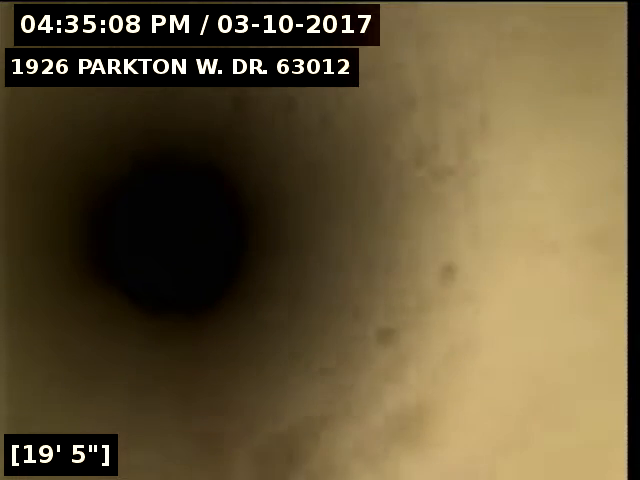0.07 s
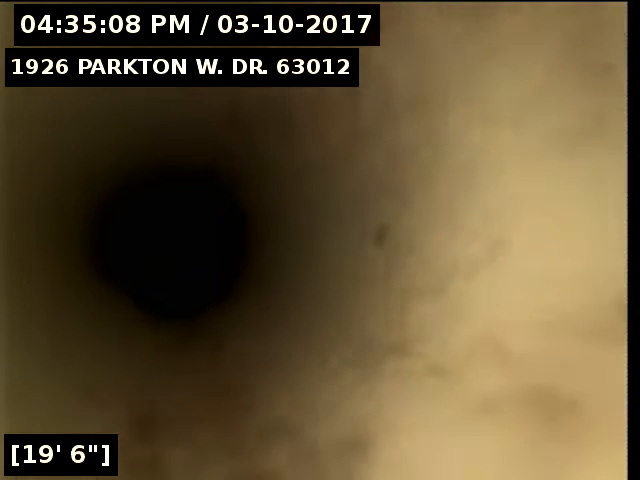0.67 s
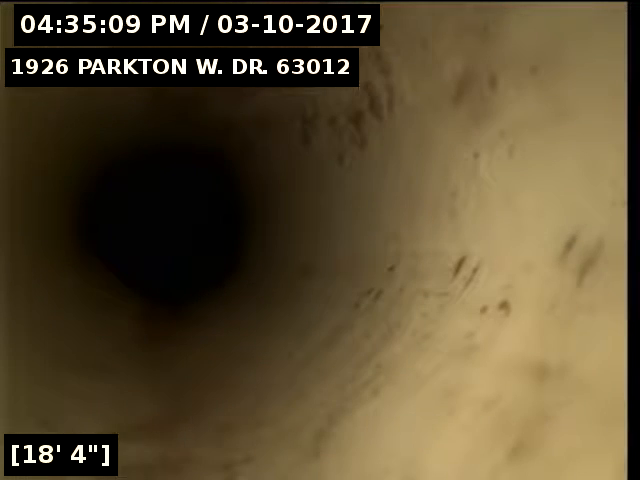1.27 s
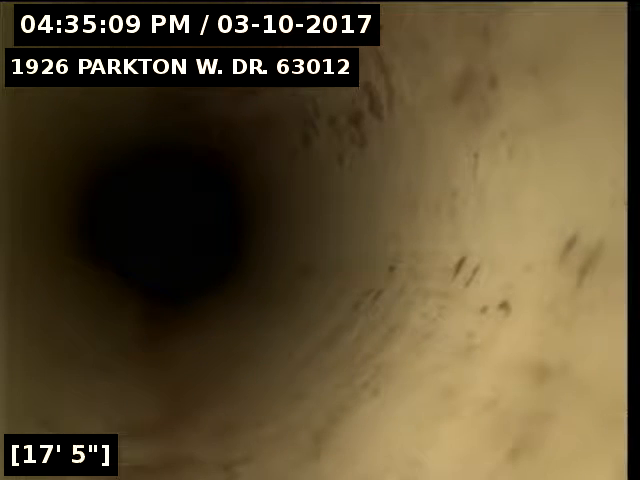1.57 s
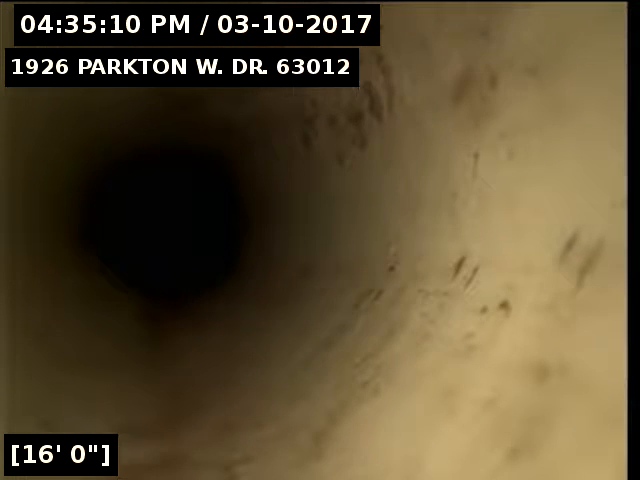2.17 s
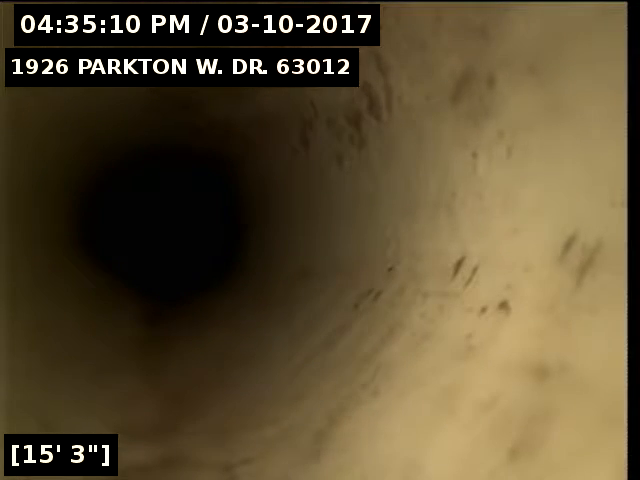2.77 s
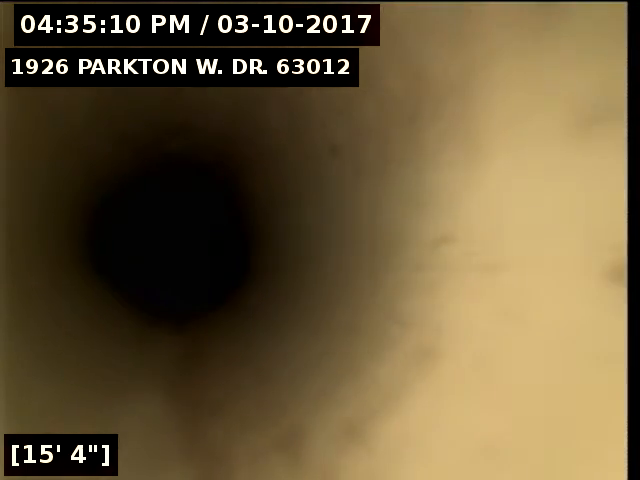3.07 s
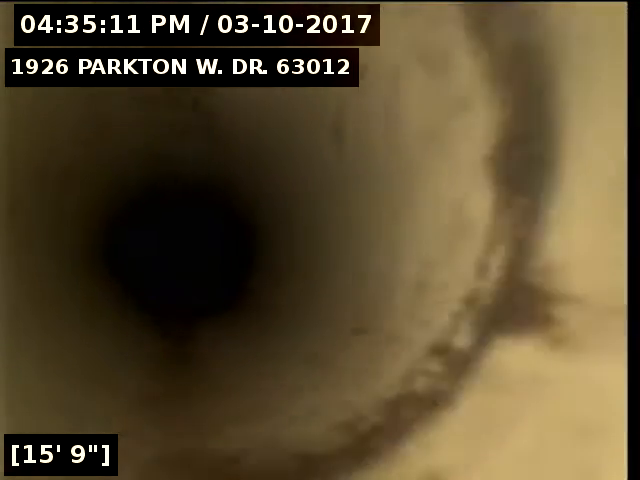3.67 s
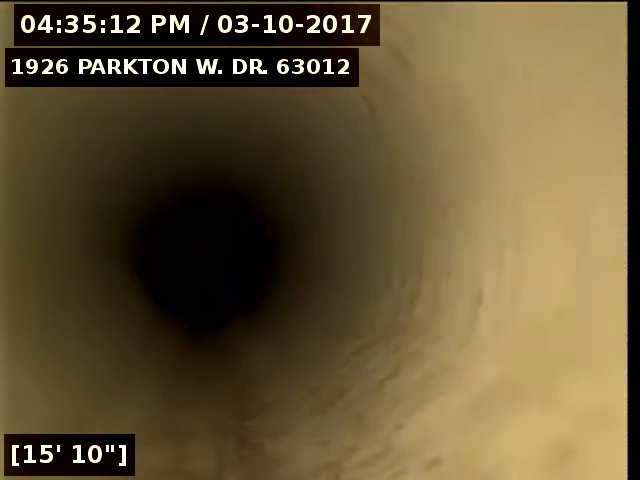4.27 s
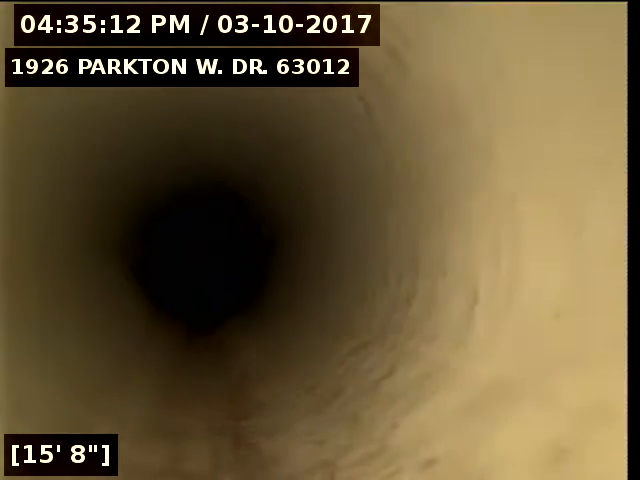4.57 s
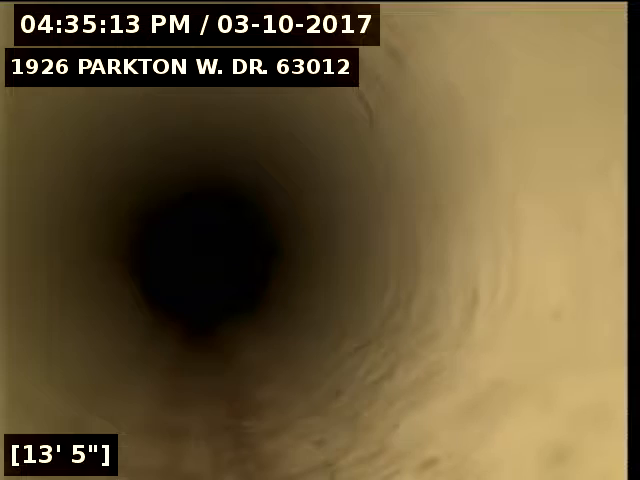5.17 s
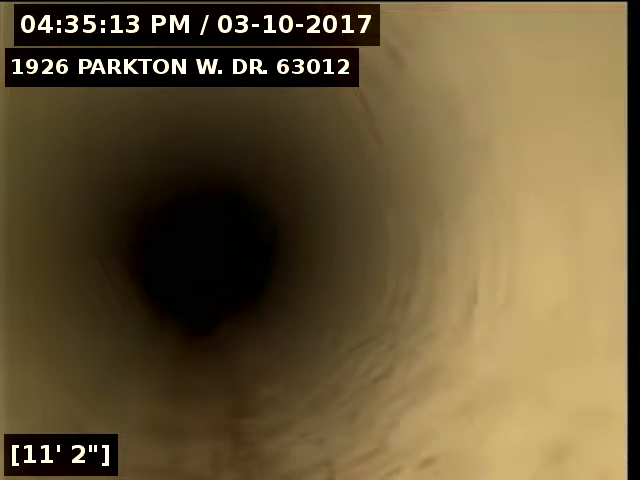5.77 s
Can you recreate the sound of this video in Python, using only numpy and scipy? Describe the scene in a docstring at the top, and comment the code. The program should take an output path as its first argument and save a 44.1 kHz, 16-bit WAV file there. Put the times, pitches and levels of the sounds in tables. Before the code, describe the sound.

Uneven rasping of a cable winding onto a metal reel in a basement, broken by sharp knocks and one loud bang.

```python
"""A push cable, hauled out of a drain, rubs back onto its reel in uneven pulls.
It drags in the reel cage, rasps and hisses through a steel guide and squeaks now and then.
It also slaps the frame, once very hard; the frame rings and the basement around it reverberates.
The microphone is a small built-in one with a notch in the treble, near enough to overload on that slap."""
import sys
import numpy as np
from scipy import signal
from scipy.io import wavfile
from scipy.ndimage import uniform_filter1d

SR = 44100
rng = np.random.default_rng(int(sys.argv[2]) if len(sys.argv) > 2 else 0)


def bounce(signal):
    """Save signal as a 16-bit WAV file at the path given by the first command-line argument."""
    frames = np.transpose(np.atleast_2d(signal))
    limited = np.clip(frames, -1, 1)
    pcm = np.round(limited * 32767).astype(np.int16)
    wavfile.write(sys.argv[1], SR, pcm)


N = 257103
TIME = np.arange(N) / SR

# Levels in the tables are relative; each source sets its own balance.
# the cable runs, nearly stops after the hardest slap, then picks up: (time [s], rasp [dB], hiss [dB])
CABLE_RUN = [(0, -57, -60), (.25, -61, -63), (.9, -60.5, -62.5), (1.25, -58.5, -62), (1.6, -54, -58),
             (1.85, -56.5, -62), (2.72, -66, -70.5), (2.93, -60.5, -63), (3.18, -57.5, -59),
             (3.55, -59, -64), (3.87, -57.5, -59), (4.1, -59.5, -65.5), (4.9, -55.5, -60.5),
             (5.33, -60.5, -64.5), (5.8, -58, -62)]
# long hauls, the reel turning and the coil dragging in its cage: (start [s], length [s], rub [dB])
LONG_HAULS = [(0.406, 0.84, -55.5), (1.33, 0.74, -52), (3.772, 0.76, -49.5), (4.8, 1.0, -54)]
# a loop of cable scrapes along the cage: (start [s], length [s], rub [dB], rasp [dB])
LOOP_SCRAPES = [(0.313, 0.044, -45, -59), (0.523, 0.087, -39.5, -62), (0.813, 0.18, -43.5, -55.5),
                (1.012, 0.084, -40, -76), (1.318, 0.22, -39, -50.5), (2.35, 0.023, -44.5, -59.5),
                (3.842, 0.083, -54, -55), (4.318, 0.069, -49, -71), (4.806, 0.088, -42.5, -56),
                (4.912, 0.14, -46.5, -56.5), (5.372, 0.2, -39, -52.5), (5.634, 0.13, -37.5, -52.5)]
# slaps on the frame: (time [s], thud [dB], crack [dB], chatter length [s], brightness [dB/octave])
FRAME_SLAPS = [(0.562, -28, -28.5, 0.0086, -1), (0.595, -34.5, -64, .008, -5.5),
               (0.792, -38.5, -65, 0.0018, -2), (0.952, -31, -52, 0.0014, -6.5),
               (1.327, -25, -56, .002, -1.5), (1.483, -30, -66, .006, -2.5), (2.031, 0.5, -6.5, .010, 0.5),
               (2.106, -19, -25.5, .0024, -1.5), (3.244, -46, -43, .008, 7),
               (4.125, -19.5, -19, 0.0055, -3.5), (4.803, -42, -64, 0.0019, 0.5),
               (5.739, -33, -44, 0.0017, -1), (5.777, -26.5, -52, 0.0045, -3.5)]
# the cable squeaks in its guide: (time [s], level [dB], pitch [Hz], length [s])
GUIDE_SQUEAKS = [(2.361, -62.5, 4740, 0.011), (2.735, -71, 2100, .06), (3.26, -45.5, 6296, 0.021)]
# modes of the rubbed cage, the steel guide and the struck frame: (frequency [Hz], level [dB])
CAGE_MODES = [(136, -7.5), (191, -3), (237, -6), (315, 1.5), (349, -3), (378, -2.5), (455, -0.5),
              (493, 0.5), (553, 2), (672, -4.5), (829, -4), (941, -5.5), (996, -12)]
GUIDE_MODES = [(1203, 6.5), (1339, 7), (1497, -8), (2017, -2.5), (2274, -1), (2308, -9.5)]
FRAME_MODES = [(237, -8.5), (318, -2), (415, -16.5), (454, -6.5), (493, -1.5), (549, -6), (641, -2),
               (673, -4.5), (719, -5.5), (771, -7), (817, -12), (922, -5.5), (953, -11.5), (984, -4),
               (1028, -4.5), (1244, -12.5), (1291, -12.5), (1371, -8.5), (1421, -14), (1628, -14),
               (1708, -14.5), (1771, -19), (1925, -15.5), (2020, -15.5), (2208, -28.5), (2357, -16.5),
               (2409, -9.5), (2482, -17), (2628, -13), (3059, -19)]
# noise spectra of the sliding cable: (frequency [Hz], density [dB])
RUB_SPECTRUM = [(40, -27), (80, -21.5), (120, -4.5), (230, -10), (275, -19), (330, -7.5), (440, 2),
                (560, 1), (700, -2), (850, -12), (1050, -17), (1500, -23), (3000, -44)]
RASP_SPECTRUM = [(40, -4), (500, -2.5), (1000, 1), (1280, -0.5), (1600, -2.5), (2400, -5), (3100, -5.5),
                 (4000, -23), (6000, -36.5)]
HISS_SPECTRUM = [(1000, -8.5), (2500, -10.5), (3500, -2.5), (5000, 3.5), (6100, 6.5), (7200, -3),
                 (8300, -20), (9500, -23.5)]
# noise spectra of a slap: (frequency [Hz], density [dB])
THUD_SPECTRUM = [(30, -31.5), (70, -29), (110, -4), (200, -7), (320, -5), (650, -0.5), (1000, -1.5),
                 (1300, -9), (2000, -12.5), (4000, -39.5)]
CRACK_SPECTRUM = [(40, -32), (150, -11), (500, -3), (1500, 5), (2400, 6.5), (3200, 1.5), (4700, -1.5),
                  (6300, 4), (7400, -14), (9000, -33)]
# basement reverberation, scaled separately for thud and crack: (frequency [Hz], base t60 [s])
BASEMENT_DECAY = [(60, 1), (200, 0.68), (600, 0.76), (1200, 0.44), (2500, 0.15), (6000, 0.24),
                  (9000, 0.073)]


def cage_rub(level_db, ring_db, noise_db):
    """Slips of the coiled cable drive the cage modes, over a dull rubbing noise."""
    jerks = slips(per_s=550, spread_db=-0.5)
    ringing = cut_lows(modes(jerks, CAGE_MODES, t60=0.71), low_hz=90.5)
    rubbing = friction(RUB_SPECTRUM, flutter_db=2.0, flutter_per_s=55)
    return from_db(level_db) * (from_db(ring_db) * ringing + from_db(noise_db) * rubbing)


def guide_rasp(level_db, ring_db, noise_db):
    """The cable's jacket grates through the guide and keeps it faintly singing."""
    ringing = modes(slips(per_s=640, spread_db=-3.0), GUIDE_MODES, t60=0.18)
    grating = friction(RASP_SPECTRUM, flutter_db=0.37, flutter_per_s=120)
    return from_db(level_db) * (from_db(ring_db) * ringing + from_db(noise_db) * grating)


def sliding_hiss(level_db):
    """The sliding cable gives off a high, slightly fluttering hiss."""
    return from_db(level_db) * friction(HISS_SPECTRUM, flutter_db=0.9, flutter_per_s=24)


def cable_levels():
    """Rub, rasp and hiss in dB: all follow the running cable and swell with each scrape; hauls add rub."""
    running_db, sliding_db = in_time(CABLE_RUN)
    rubs, rasps = [], []
    for start, length, db in LONG_HAULS:
        rubs.append(from_db(db) * stroke(start, length, attack_s=0.015, release_s=0.36))
    for start, length, rub, rasp in LOOP_SCRAPES:
        rubs.append(from_db(rub) * stroke(start, length, attack_s=0.043, release_s=0.054))
        rasps.append(from_db(rasp) * stroke(start, length, attack_s=0.043, release_s=0.099))
    rub_db = power_sum_db([from_db(running_db - 1)] + rubs)
    rasp_db = power_sum_db([from_db(running_db)] + rasps)
    scrape_hiss_db = power_sum_db(rasps) - 9
    hiss_db = power_sum_db([from_db(sliding_db), from_db(scrape_hiss_db)])
    return rub_db, rasp_db, hiss_db


def slaps(ring_db, thud_db, crack_db, snap_db, crack_s):
    """Each slap is a bright crack and a chattering thud that leaves the frame ringing."""
    contacts = slap_contacts(touch_db=-5, landing_lag=0.9)
    thud_power = sum(from_db(2 * db) * blow(start, length) for start, db, length, _ in contacts)
    crack_power = sum(from_db(2 * db) * blow(start, crack_s) for start, _, db, _, _ in FRAME_SLAPS)
    ringing = from_db(ring_db) * frame_ring(contacts, after_ring_db=-20)
    thuds = from_db(thud_db) * basement_reverb(thud_power, THUD_SPECTRUM, decay_scale=0.46)
    cracks = from_db(crack_db) * basement_reverb(crack_power, CRACK_SPECTRUM, decay_scale=0.99)
    # the crack reaches the microphone dry before its reflections build up
    snap_noise = sum(band for _, band in noise_bands(CRACK_SPECTRUM))
    snaps = from_db(snap_db) * np.sqrt(crack_power * crack_s * SR) * snap_noise
    return ringing + thuds + cracks + snaps


def slap_contacts(touch_db, landing_lag):
    """A loop touches lightly, then lands with its weight landing_lag chatter lengths later."""
    touches, landings = [], []
    for start, db, _, length, brightness in FRAME_SLAPS:
        touches.append((start, db + touch_db, length, brightness))
        landings.append((start + landing_lag * length, db, length, brightness))
    return touches + landings


def frame_ring(contacts, after_ring_db):
    """The struck frame rings briefly; a weak after-ring lingers, longest in the middle modes."""
    starts, contact_db, lengths, brightness = np.transpose(contacts)
    ringing = 0
    for hz, db in FRAME_MODES:
        octaves = np.log2(hz / 600)
        # the chatter reaches each mode at a moment of its own; each slap's brightness tilts it towards the high
        # or low modes
        delay, polarity = rng.random((len(starts), 2)).T
        arrivals = ((starts + lengths * delay) * SR).astype(int)
        push = np.zeros(N)
        push[arrivals] = from_db(contact_db + brightness * octaves) * np.sign(polarity - 0.5)
        first_ring = ring(push, hz, t60=0.16 * 2 ** (-0.25 * max(octaves, 0)))
        after_ring = ring(push, hz, t60=0.74 * 2 ** (-0.4 * abs(octaves)))
        ringing += from_db(db) * (first_ring + from_db(after_ring_db) * after_ring)
    return cut_lows(ringing, low_hz=180)


def squeaks(t60, detune):
    """A short stick-slip in the guide excites a cluster of three high, close modes."""
    out = 0
    for start, db, hz, length in GUIDE_SQUEAKS:
        push = np.sqrt(blow(start, length)) * rng.standard_normal(N)
        cluster = sum(ring(push, hz * (1 + detune * k), t60) for k in (-1, 0, 1))
        peak_rms = np.sqrt(uniform_filter1d(cluster ** 2, size=900).max())   # loudest 20 ms
        out += from_db(db) * cluster / peak_rms
    return out


def basement_reverb(power, spectrum, decay_scale):
    """Dense reflections store the power of the blows and lose it band by band."""
    out = 0
    for hz, band in noise_bands(spectrum):
        t60 = decay_scale * at_hz(BASEMENT_DECAY, hz)
        power_kept = from_db(-120 / (t60 * SR))
        stored = signal.lfilter([1], [1, -power_kept], power + 1e-24)
        out += band * np.sqrt(stored)
    return out


def slips(per_s, spread_db):
    """Tiny stick-slip jerks of uneven size, at random moments."""
    sizes = from_db(spread_db * np.minimum(rng.exponential(1, N), 4))
    signs = rng.choice([-1, 1], N)
    return sizes * signs * (rng.random(N) < per_s / SR)


def friction(spectrum, flutter_db, flutter_per_s):
    """Rubbing noise whose bands flutter as the contact grips and lets go; rms 1."""
    grip = drift(flutter_per_s)   # common to all bands
    out = 0
    for _, band in noise_bands(spectrum):
        out += band * from_db(flutter_db * (grip + drift(flutter_per_s)))
    return rms_one(out)


def stroke(start, length, attack_s, release_s):
    """Gain of one contact: it rises, holds, then falls to 1/e in release_s."""
    age = TIME - start
    rise = np.clip(age / attack_s, 0, 1)
    return rise * np.exp(-np.clip((age - length) / release_s, 0, 60))


def blow(start, length):
    """Power fed in by one brief contact: it starts at once and dies away; sum 1."""
    age = TIME - start
    power = (age >= 0) * np.exp(-np.clip(age / length, 0, 60))
    return power / power.sum()


def modes(push, table, t60):
    """A body rings in all the modes of its table, in alternating polarity; rms 1."""
    return rms_one(sum((-1) ** k * from_db(db) * ring(push, hz, t60) for k, (hz, db) in enumerate(table)))


def ring(push, hz, t60):
    """One mode: a unit click sets a sine of height 1 ringing."""
    decay, angle = from_db(-60 / (t60 * SR)), 2 * np.pi * hz / SR
    return signal.lfilter([0, np.sin(angle)], [1, -2 * decay * np.cos(angle), decay ** 2], push + 1e-18)


def cut_lows(x, low_hz):
    """Little of the ringing sounds below low_hz."""
    return signal.sosfilt(signal.butter(2, low_hz, "high", fs=SR, output="sos"), x)


def noise_bands(spectrum):
    """Third-octave noise bands as (centre [Hz], samples); their powers sum to 1."""
    edges = 28 * 2 ** (np.arange(26) / 3) * 1.06
    white, bands = rng.standard_normal((2, N)), []
    for k, (low, high) in enumerate(zip(edges, edges[1:])):
        hz = np.sqrt(low * high)
        band = signal.sosfilt(signal.butter(2, [low, high], "band", fs=SR, output="sos"), white[k % 2])
        bands.append((hz, band * from_db(at_hz(spectrum, hz))))
    total_rms = np.sqrt(sum(np.var(band) for _, band in bands))
    return [(hz, band / total_rms) for hz, band in bands]


def drift(per_s):
    """A random wander of rms 1 that turns about per_s times a second."""
    knots = np.arange(0, N / SR + 1, 1 / per_s)
    return rms_one(np.interp(TIME, knots, rng.standard_normal(N)[:len(knots)]))


def in_time(rows):
    """Read each column of a curve at every sample."""
    times, *columns = np.transpose(rows)
    return [np.interp(TIME, times, column) for column in columns]


def at_hz(table, hz):
    """Read a table on a log-frequency axis."""
    frequencies, values = np.transpose(table)
    return np.interp(np.log(hz), np.log(frequencies), values)


def power_sum_db(gains):
    """Level in dB of unrelated sounds whose powers add."""
    return 10 * np.log10(sum(gain ** 2 for gain in gains) + 1e-20)


def from_db(db):
    """Decibels to gain."""
    return 10 ** (np.asarray(db) / 20)


def rms_one(x):
    """Scale to rms 1."""
    return x / np.sqrt(np.mean(x ** 2) + 1e-20)


def scene():
    """At the microphone, in mono: the cable's rub, rasp and hiss, with slaps and squeaks on top."""
    rub_db, rasp_db, hiss_db = cable_levels()
    rub = cage_rub(rub_db, ring_db=-3.5, noise_db=-4.5)
    rasp = guide_rasp(rasp_db, ring_db=-4, noise_db=1.5)
    hiss = sliding_hiss(hiss_db)
    knocks = slaps(ring_db=-11, thud_db=-14.5, crack_db=-9, snap_db=-8, crack_s=0.003)
    return (rub + rasp + hiss + knocks + squeaks(t60=0.056, detune=0.031))[None]


def preamp_overload(x, thump_gain, thump_hz):
    """The preamplifier clips, sooner on the downward swing; its bias shifts and makes a low thump."""
    limit = np.where(x > 0, 0.58, 0.43)
    clipped = x / (1 + (x / limit) ** 6) ** (1 / 6)
    excess = np.tanh(abs(x - clipped))
    thump = signal.sosfilt(signal.butter(2, thump_hz, "band", fs=SR, output="sos"), excess)
    return clipped + thump_gain * thump


def record(dry):
    """The built-in microphone: a treble dip, overload, a notch, a roll-off and a steep top cut."""
    notch_hz, notch_width_hz, rolloff_hz, cutoff_hz = 4000, 1140, 7900, 9500
    dipped = signal.lfilter(*signal.iirnotch(notch_hz, Q=5.0, fs=SR), dry)
    overloaded = preamp_overload(dipped, thump_gain=1.2, thump_hz=[15, 128])
    notched = signal.lfilter(*signal.iirnotch(notch_hz, Q=notch_hz / notch_width_hz, fs=SR), overloaded)
    rolled = signal.sosfilt(signal.butter(8, rolloff_hz, fs=SR, output="sos"), notched)
    return signal.sosfilt(signal.cheby2(16, 60, cutoff_hz, fs=SR, output="sos"), rolled)


dry = scene()
out = record(dry)
bounce(out)
```